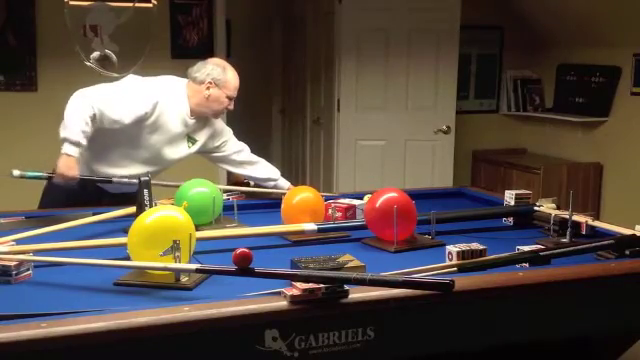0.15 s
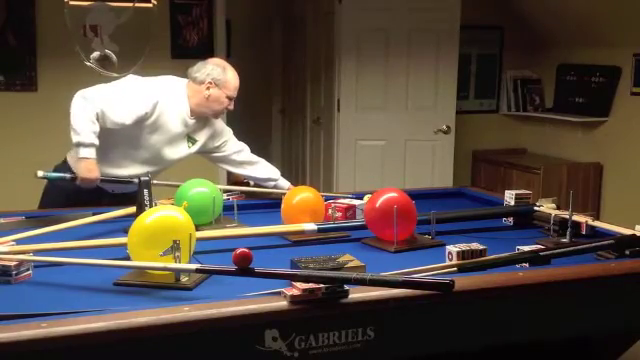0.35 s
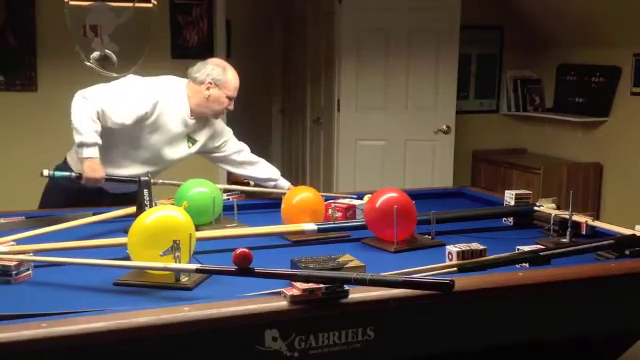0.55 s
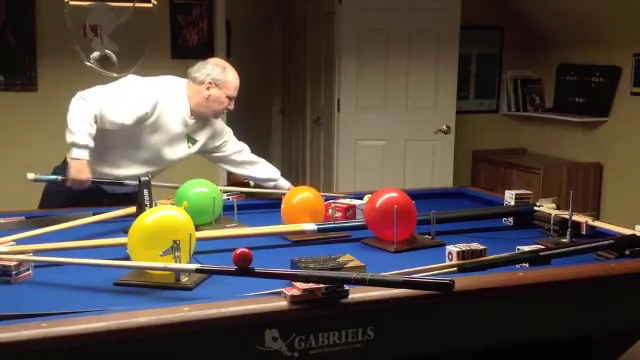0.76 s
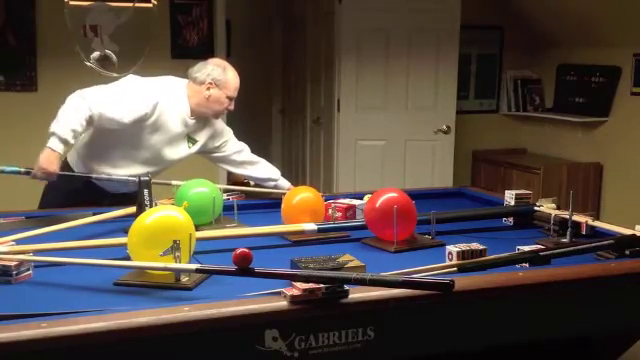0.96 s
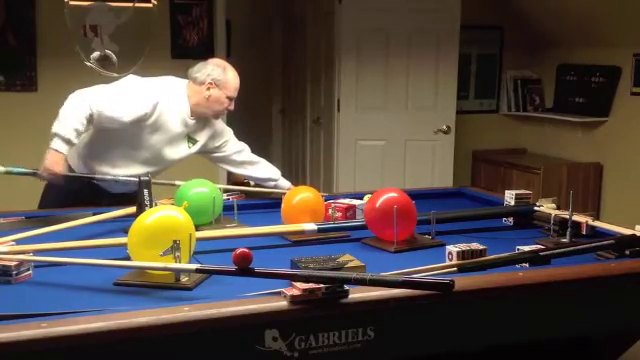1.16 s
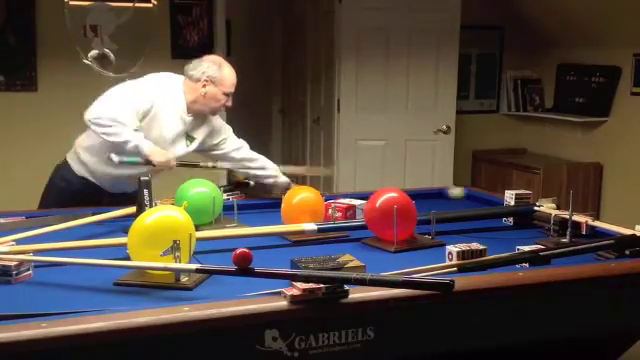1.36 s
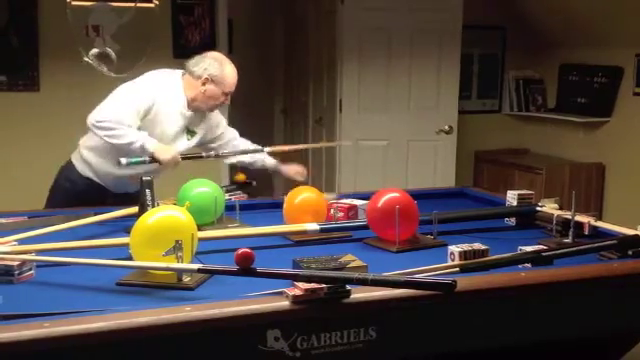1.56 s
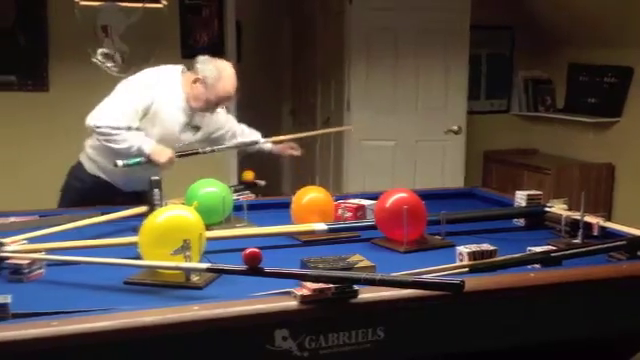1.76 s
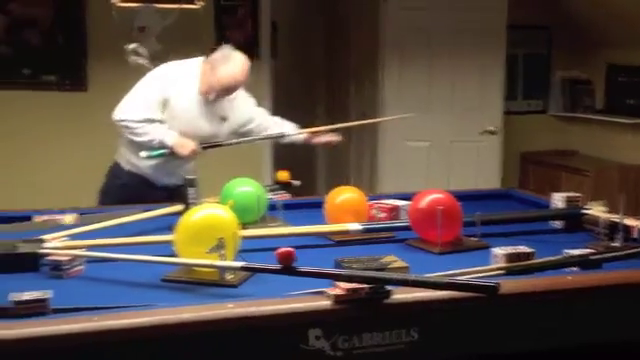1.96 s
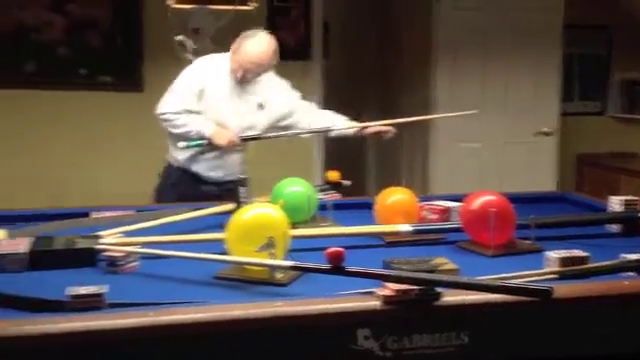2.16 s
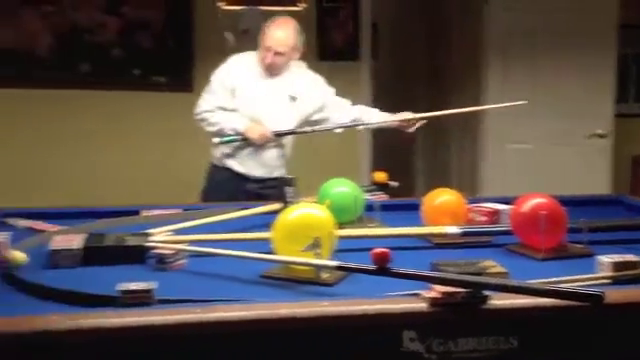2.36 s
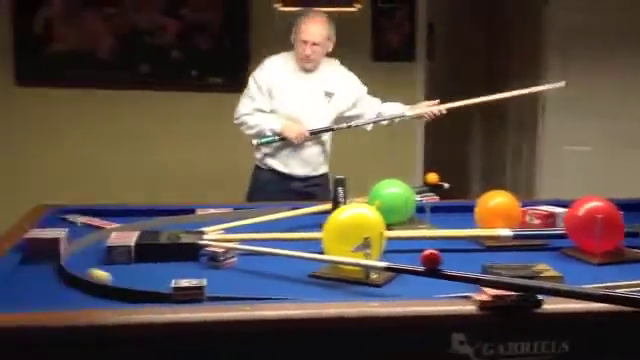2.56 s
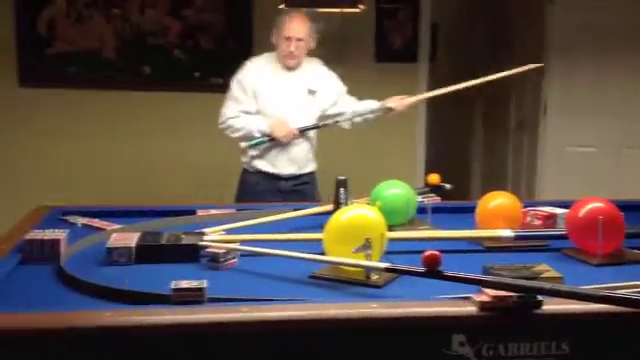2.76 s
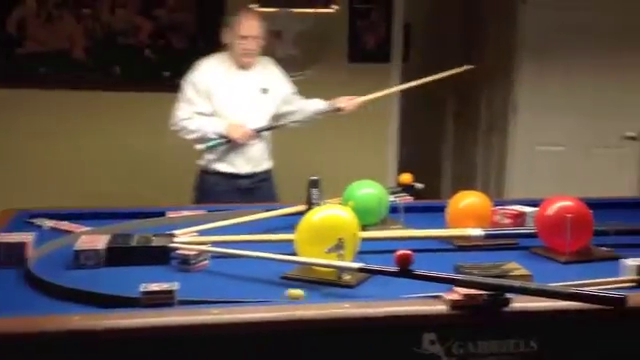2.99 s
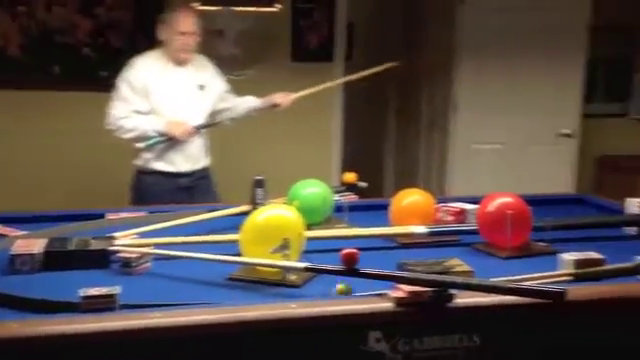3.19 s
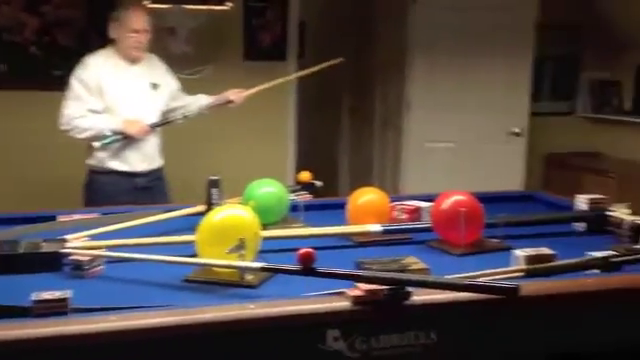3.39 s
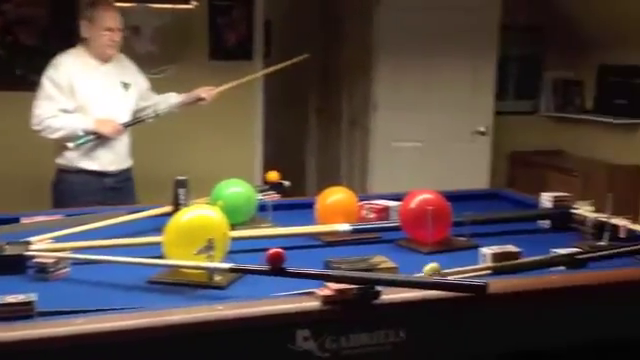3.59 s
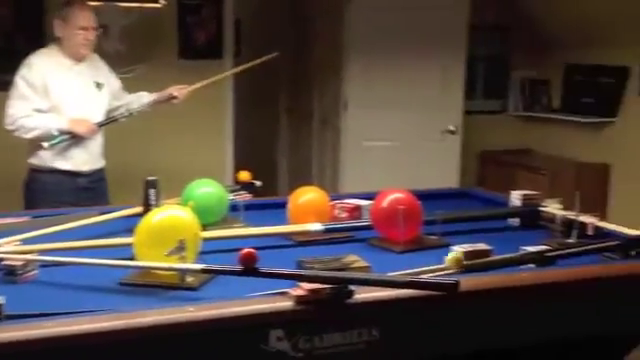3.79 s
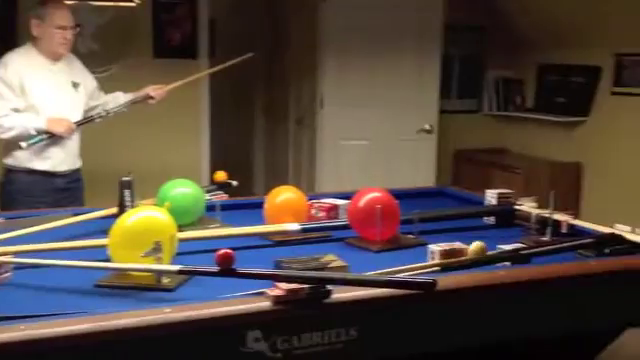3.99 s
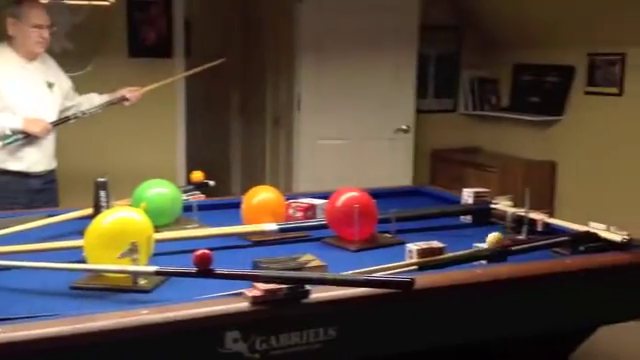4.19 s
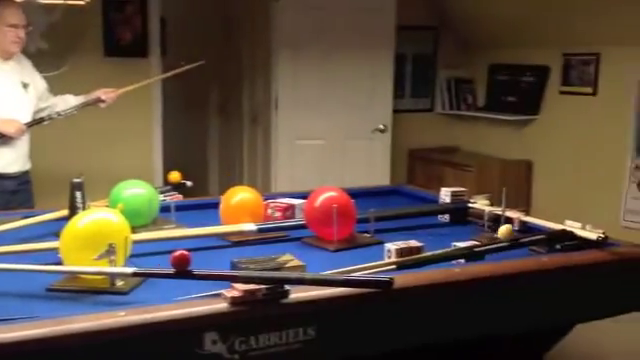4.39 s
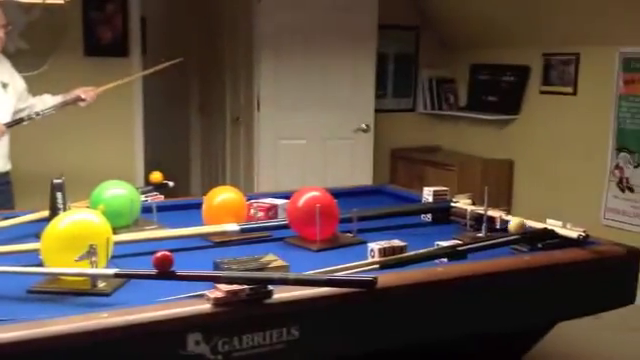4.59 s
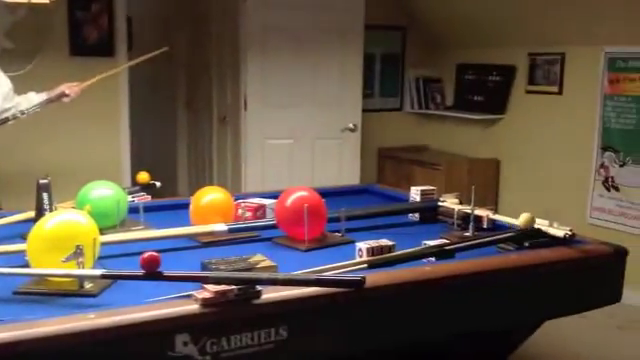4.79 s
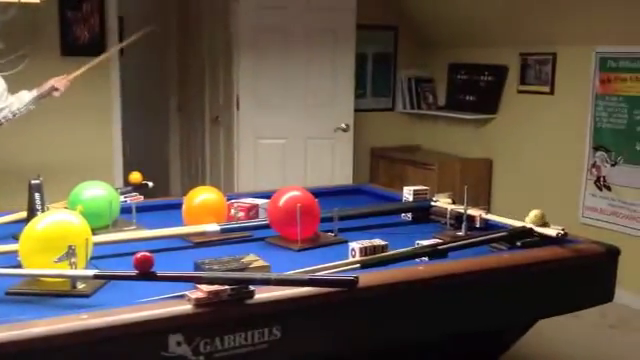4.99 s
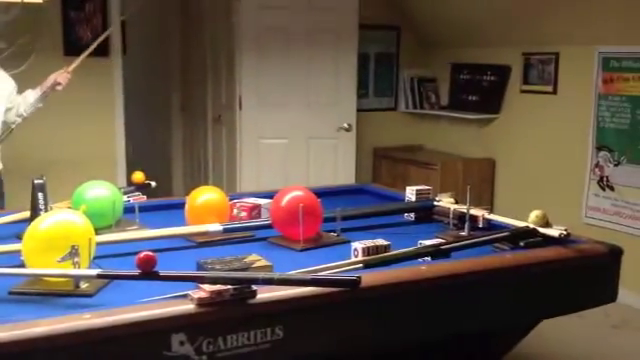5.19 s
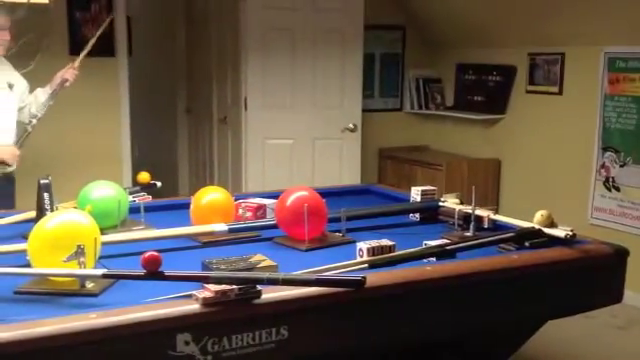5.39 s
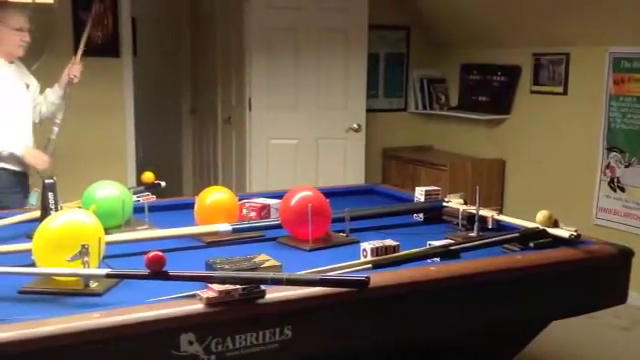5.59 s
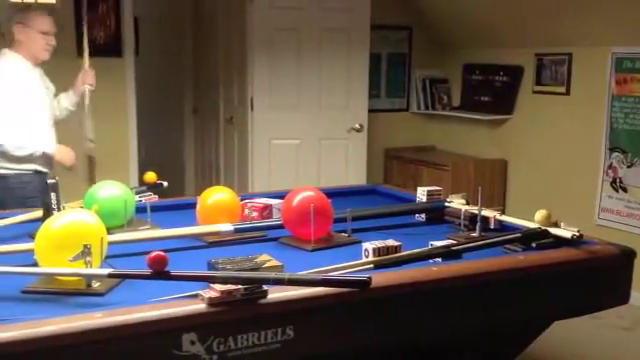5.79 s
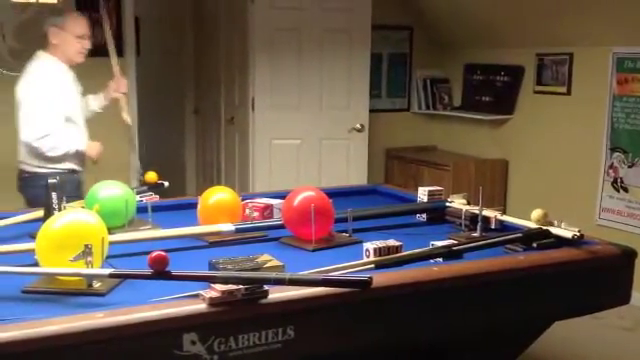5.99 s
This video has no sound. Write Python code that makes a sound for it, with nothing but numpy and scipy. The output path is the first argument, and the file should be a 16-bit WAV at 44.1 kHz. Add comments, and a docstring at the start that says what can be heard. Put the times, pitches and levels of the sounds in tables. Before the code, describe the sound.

In a small carpeted den with faint hiss, wavering low hum and thin motor whine, a cue strikes a ball loudly after a second of quiet. Thuds over props and cushions follow, then fading skips on cloth, hard clicks and a soft roll. Light knocks on rail and sticks lead to faint ramp bumps, ending in a short bright clatter of thin metal. The microphone stands a little away, catching short room echoes.

```python
"""A trick shot on a pool table in a carpeted den. Air, microphone hiss, a swelling hum and a small motor's
whine run throughout, as shaped noise, noise-driven resonances and sines. The cue strikes and the ball thuds
over props and cushions amid deep soft thumps, skips over the cloth, rolls, clicks hard, knocks on rail and
sticks, bumps up a ramp of cue sticks and clatters into thin metal parts. Blows are bursts of touches that
crack, ring modes and echo in the room; rolling is filtered noise of uneven grains."""
import sys
import numpy as np
from scipy import signal
from scipy.fft import rfft, irfft
from scipy.io import wavfile

SR = 44100
rng = np.random.default_rng(int(sys.argv[2]) if len(sys.argv) > 2 else 0)


def to_wav(s):
    """Save 16-bit WAV."""
    ch = np.atleast_2d(s).T  # columns
    pcm = np.round(np.clip(ch, -1, 1) * 32767)  # PCM
    wavfile.write(sys.argv[1], SR, pcm.astype(np.int16))


N = 266805  # length in samples

# Air and microphone hiss, spectral shape: f/Hz, relative level/dB per Hz
AIR_SPECTRUM = [(30, -45.5), (60, -45), (90, -19.5), (120, -3), (250, -4), (360, 5), (450, -5.5),
                (600, -10.5), (900, -14), (2000, -17.5), (4500, -19.5), (10000, -22), (15400, -26)]
AIR_DB = -63.5  # rms
# Wavering hum resonances: f/Hz, width/Hz, rms level/dB before the swell
HUM_BANDS = [(335.5, 2.7, -58.5), (677, 36, -74.5)]
# Gain of the hum over time: t/s, level/dB
HUM_SWELL_CURVE = [(0, -3), (1.2, -9.5), (3.4, -0.5), (4.7, -2.5), (6.05, 1.8)]
# Motor whine lines: multiple of the motor speed, mean rms level/dB
MOTOR_LINES = [(20, -63.5), (21, -82), (24, -83), (36, -84), (39, -84), (40, -84.5)]
MOTOR_HZ = 48.14

# Blow levels below are rms over the first 40 ms, before the final filters.
# Cue strikes: t/s, level/dB
CUE_STRIKES = [(1.2935, -21.5), (1.3005, -26.5)]
# Thuds of the table bed, the first as the cue strike shakes it, the rest as the ball lands on props and
# cushions: t/s, level/dB, contact/ms
BED_THUDS = [(1.3, -27.5, 0.56), (1.4, -30, 0.97), (1.558, -28.5, 0.63), (1.574, -33, 0.48),
             (1.666, -30.5, 0.76), (2.153, -45, 0.86), (3.476, -56.5, 2.4), (4.98, -39.5, 0.36),
             (5.071, -51.5, 0.87)]
# Deep soft low thumps: t/s, peak level/dB, f/Hz
LOW_THUMPS = [(1.432, -46, 119), (1.553, -61, 45)]
# Skipping touches on the cloth: t/s, level/dB
CLOTH_SKIPS = [(1.695, -39), (1.722, -45), (1.746, -39.5), (1.764, -45), (1.792, -44), (1.818, -49),
               (1.84, -48.5), (1.882, -52.5)]
# Four rolls, dull, brighter, brightest, mostly dull:
# start t/s, end t/s, nominal starting level/dB, fade/dB per s (negative grows), hardness/0-1
ROLL_STRETCHES = [(1.863, 2.128, -57.5, 14, 0), (2.18, 3.109, -59.5, -5, 0.46),
                  (3.078, 3.432, -64, 17, 0.6), (3.484, 5.0, -57.5, 7.5, 0.1)]
# Swell of the bright part of the rolling sound: t/s, gain level/dB
BRIGHT_ROLL_SWELL = [(2.3, 4), (2.36, 1), (2.415, 7.5), (2.435, 3), (2.475, 2), (2.488, 12), (2.55, 4.5),
                     (2.71, -1), (2.76, 2.5), (2.87, -3), (2.95, 2), (3.08, -3)]
# Hard clicks and faint ticks: t/s, level/dB, contact/ms, centre f/Hz of the struck spot
HARD_CLICKS = [(1.9358, -35, 0.074, 2880), (1.9445, -57, 0.16, 6000), (2.1524, -39.5, 0.054, 2520),
               (2.1705, -50.5, 0.052, 10000), (2.183, -52, .09, 7000), (2.195, -44, 0.13, 5500),
               (2.2063, -49, 0.087, 6840), (2.224, -59, 0.067, 9000), (3.779, -70, 0.092, 3500),
               (5.627, -67.5, 0.05, 9000)]
# Knocks of the ball on rail and sticks: t/s, level/dB, contact/ms, centre f/Hz of the struck spot
BALL_KNOCKS = [(2.158, -45, 0.37, 920), (2.175, -49.5, 0.38, 1510), (2.191, -46.5, 0.25, 1610),
               (2.21, -54, 0.34, 1180), (3.201, -58, 4, 607), (3.272, -46, 0.27, 2600),
               (3.288, -47.5, 0.4, 1380), (3.454, -47.5, 0.34, 2880), (3.474, -42.5, 0.34, 2420),
               (3.496, -53, 0.54, 1510), (5.459, -59, 0.46, 1770)]
# Bumps over joints of the ramp: t/s, level/dB, contact/ms, centre f/Hz of the struck spot
JOINT_BUMPS = [(3.875, -59.5, 0.7, 1170), (4.022, -58.5, 1, 1290), (4.119, -58, 0.99, 1220),
               (4.24, -57.5, 0.54, 830), (4.405, -66.5, 0.64, 800), (4.46, -58, 0.99, 980),
               (4.691, -56, 0.56, 1310)]
# Clatter of thin metal parts: t/s, level/dB, contact/ms, centre f/Hz of the struck spot
METAL_HITS = [(4.9237, -63, 0.32, 1790), (4.969, -35, 0.092, 2050), (4.979, -36.5, 0.15, 2600),
              (5.038, -33.5, 0.095, 2550), (5.051, -40, 0.089, 3000), (5.072, -34.5, 0.13, 980),
              (5.0953, -35, 0.064, 4100), (5.119, -39.5, .18, 3220), (5.1544, -47, 0.39, 1470),
              (5.301, -46.5, 0.2, 2200), (5.3195, -44, 0.33, 3600), (5.345, -75, 0.26, 3000),
              (5.414, -53, 0.47, 2940)]

# Ringing modes of each struck thing: f/Hz, relative level/dB, t60/s
CUE_MODES = [(280, -10, 0.02), (427, -2, 0.03), (610, -18, 0.043), (1010, 0.5, 0.023), (1096, 1, 0.029),
             (1320, 9.5, 0.0099), (1680, -7, 0.033), (1800, -2, 0.008), (2374, -6, 0.096), (2550, 4, .03),
             (2636, 6, .03), (2380, 8, .012), (3224, 5, 0.012)]
BED_MODES = [(165.8, -9, 0.18), (183, -3, 0.071), (245, -10, 0.14), (295.8, -5, 0.13), (377.7, -3, 0.055),
             (465, 1.5, 0.059), (548.6, -1.5, 0.038), (639, -4, 0.094), (959, 17.5, 0.0034),
             (1620, 18, 0.0075), (1850, 15, 0.0086), (2400, 20, 0.0043), (2872, 18, 0.003)]
RAIL_MODES = [(525, -5, 0.028), (1604, 8.5, 0.02), (2047, 7.5, 0.065), (2600, 16, 0.0031),
              (3700, 10, 0.0025), (4970, -14, 0.014)]
STICK_MODES = [(311, -14, 0.013), (780, 3.5, 0.028), (983, -10, 0.05), (1504, -3.5, 0.052),
               (1715, -15.5, 0.044), (2240, -4.5, 0.051), (2306, 9.5, 0.0095), (2850, -1.5, 0.02),
               (3070, 9.5, 0.005), (3590, 9, 0.013), (3600, 4.5, 0.016)]
METAL_MODES = [(950, 0, 0.06), (1500, 0, 0.05), (1985, 5, 0.045), (2470, 4, 0.05), (3030, 2, 0.04),
               (3220, 4, 0.055), (3780, 3, 0.07), (3890, 2, 0.06), (2250, 16, 0.006), (4670, 3, 0.055),
               (5460, 4, 0.04), (6250, 5, 0.03), (7110, 6, 0.03), (7550, 5, 0.03)]
# Decay of the room's echoes: f/Hz, t60/s
ROOM_DECAY = [(105, 0.38), (180, 0.83), (400, 0.59), (1000, 0.28), (2500, 0.24), (6000, 0.28),
              (14000, 0.11)]

TAIL = 24000  # samples kept after each blow
BUILD_UP_S = 0.0025  # rise of the echoes
SPOT_SHARPNESS = 2.2  # centre over width of the region the struck spot brings out


def amp(db):
    """Turn dB into linear gain."""
    return 10 ** (np.asarray(db) / 20)


def rms_one(x):
    """Scale a signal to rms 1."""
    return x / np.sqrt(np.mean(x ** 2) + 1e-20)


def curve_db(points, t):
    """Read a table of time and dB as gain, straight in dB between points."""
    return amp(np.interp(t, *np.transpose(points)))


def at_hz(points, hz):
    """Read a frequency table along a logarithmic frequency axis."""
    table_hz, values = np.transpose(points)
    return np.interp(np.log(hz), np.log(table_hz), values)


def ring(x, hz, t60):
    """Drive a decaying resonance: a unit click sets off a sine that starts near height 1."""
    radius = amp(-60 / (t60 * SR))
    angle = 2 * np.pi * hz / SR
    return signal.lfilter([0, np.sin(angle)], [1, -2 * radius * np.cos(angle), radius ** 2], x)


def filtered(x, order, hz, kind):
    """Pass a signal through a Butterworth filter."""
    return signal.sosfilt(signal.butter(order, hz, kind, fs=SR, output="sos"), x)


def drift(rate):
    """Random wander: normal knots, rate per second, joined by straight lines."""
    knots = rng.standard_normal(int(N / SR * rate) + 2)
    return np.interp(np.arange(N) * rate / SR, np.arange(len(knots)), knots)


def room(echo_db):
    """Echoes of one spot: direct sound, then noise that builds up and dies away band by band."""
    t = np.arange(TAIL) / SR
    edges = 80 * 2 ** np.arange(0, 8.1, .8)
    bins = np.fft.rfftfreq(TAIL, 1 / SR)
    spectrum = rfft(rng.standard_normal(TAIL))
    echoes = np.zeros(TAIL)
    for low, high in zip(edges, edges[1:]):
        band = irfft(spectrum * (bins >= low) * (bins < high), TAIL)
        echoes += band * amp(-60 * t / at_hz(ROOM_DECAY, np.sqrt(low * high)))
    echoes *= 1 - np.exp(-(t / BUILD_UP_S) ** 2)
    echoes *= amp(echo_db) / np.sqrt(np.sum(echoes ** 2))
    echoes[0] = 1  # direct sound
    return echoes


def blows(events, modes, crack_db, low_hz, touches_per_s, echo_db, first_touch, rattle_s, swell_s, detune,
          contact_s=0, softening=0, reflection_db=-np.inf, reflection_s=.003, spot_db=0):
    """Touches, an optional rattle and reflection crack, ring modes and fill the room; long contacts are dull."""
    out = np.zeros(N + TAIL)
    t = np.arange(TAIL // 2) / SR
    hardest_db = max(row[1] for row in events)
    for start, level_db, *more in events:
        # a loose thing starts weakly and swells as it rattles
        touches = (rng.random(len(t)) < touches_per_s / SR) * rng.standard_normal(len(t))
        touches *= np.exp(-t / rattle_s) * (1 - np.exp(-t / swell_s))
        touches[0] = first_touch
        lag = round(reflection_s * SR)
        touches[lag:] += amp(reflection_db) * touches[:-lag]

        # force swells and fades over the contact; where the row gives none, weaker means longer
        contact = more[0] / 1000 if more else contact_s * amp(softening * (hardest_db - level_db))
        push = t[:300] ** 3 * np.exp(-8 * t[:300] / contact)
        force = np.convolve(touches, push)[:len(t)]

        body = np.zeros(len(t))
        sign = -(-1.) ** (len(modes) - 1)  # neighbouring modes start in opposite phase
        for hz, mode_db, t60 in modes:
            gain = sign * amp(mode_db + rng.normal(0, 1.5))
            body += gain * ring(force, hz * rng.normal(1, detune), t60)
            sign = -sign
        crack = filtered(force, 2, low_hz, "high")
        struck = body + amp(crack_db) * crack
        if len(more) > 1:
            spot = signal.lfilter(*signal.iirpeak(more[1], SPOT_SHARPNESS, fs=SR), struck)
            struck = struck + amp(spot_db) * spot

        heard = signal.fftconvolve(struck, room(echo_db))[:TAIL]
        first_rms = np.sqrt(np.mean(heard[:SR // 25] ** 2))  # first 40 ms
        at = round(start * SR)
        out[at:at + TAIL] += amp(level_db) * heard / first_rms
    return out[:N]


def air_hiss():
    """Air and microphone hiss: noise shaped by its spectrum."""
    bins = np.fft.rfftfreq(N, 1 / SR) + 1  # 1 Hz up, to keep the logarithm finite
    return amp(AIR_DB) * rms_one(irfft(rfft(rng.standard_normal(N)) * amp(at_hz(AIR_SPECTRUM, bins)), N))


def air_hum():
    """Wavering hum: noise keeps narrow resonances ringing under a slow swell."""
    hum = np.zeros(N)
    for hz, width, level_db in HUM_BANDS:
        hum += amp(level_db) * rms_one(ring(rng.standard_normal(N), hz, 3.3 / width))
    return curve_db(HUM_SWELL_CURVE, np.arange(N) / SR) * hum


def motor_whine():
    """Steady-pitched sines at multiples of the motor speed, each wandering slightly in level."""
    t = np.arange(N) / SR
    whine = np.zeros(N)
    for multiple, level_db in MOTOR_LINES:
        line = np.sin(2 * np.pi * (multiple * MOTOR_HZ * t + rng.random()))
        whine += np.sqrt(2) * amp(level_db + 0.5 * drift(6.4)) * line
    return whine


def cue_strike():
    """The cue rings and rattles briefly after a very short contact."""
    return blows(CUE_STRIKES, CUE_MODES, crack_db=29.5, low_hz=261, touches_per_s=7300, echo_db=-7.5,
                 first_touch=0.05, contact_s=0.00016, softening=0.0065, rattle_s=0.013, swell_s=0.0017,
                 detune=0.0028)


def thuds():
    """Thuds set the table bed ringing: the first as the cue strike shakes it, the others as the ball lands on
    props and cushions."""
    return blows(BED_THUDS, BED_MODES, crack_db=25.5, low_hz=255, touches_per_s=5000, echo_db=-3.5,
                 first_touch=0.042, rattle_s=0.0065, swell_s=0.0044, detune=0.013)


def low_thumps():
    """Deep soft low thumps: a few sine cycles that swell and fade."""
    out = np.zeros(N)
    for start, peak_db, hz in LOW_THUMPS:
        t = np.arange(int(3.5 / hz * SR)) / SR  # 3.5 cycles
        at = round(start * SR)
        out[at:at + len(t)] += amp(peak_db) * np.hanning(len(t)) * np.sin(2 * np.pi * hz * t)
    return out


def skips():
    """The ball skips over the cloth; weaker touches have longer contacts and sound duller."""
    return blows(CLOTH_SKIPS, BED_MODES, crack_db=29, low_hz=253, touches_per_s=5300, echo_db=0,
                 first_touch=0.28, contact_s=0.00095, softening=0.39, rattle_s=0.019, swell_s=0.0018,
                 detune=0.013)


def rolling():
    """Uneven grains under the ball: bright and dull grains mixed by hardness, the dull with a bed drone."""
    t = np.arange(N) / SR
    grains = rng.standard_normal(N) * amp(2.4 * drift(38) + 1.6 * drift(8))
    dull = rms_one(filtered(grains, 2, [130, 900], "band"))
    bright = rms_one(filtered(grains, 2, [550, 2100], "band"))
    bed = rms_one(sum(amp(db) * ring(dull, hz, t60) for hz, db, t60 in BED_MODES))
    bright_roll = curve_db(BRIGHT_ROLL_SWELL, t) * bright
    dull_roll = 0.82 * dull + 0.073 * bed
    out = np.zeros(N)
    for start, end, level_db, fade_db, hardness in ROLL_STRETCHES:
        edges = np.clip(np.minimum(t - start, end - t) / 0.029, 0, 1)  # 29 ms fades
        level = amp(level_db - fade_db * np.clip(t - start, 0, end - start))
        out += edges * level * (np.sqrt(hardness) * bright_roll + np.sqrt(1 - hardness) * dull_roll)
    return out


def hard_clicks():
    """Hard clicks and faint ticks: one touch and one quick reflection ring short modes, with no rattle."""
    return blows(HARD_CLICKS, RAIL_MODES, crack_db=28.5, low_hz=980, touches_per_s=0, echo_db=-4,
                 first_touch=1, spot_db=-3.5, rattle_s=1, swell_s=1, detune=0.011, reflection_db=0.5,
                 reflection_s=0.00269)


def ball_knocks():
    """Knocks of the ball on rail and sticks ring and rattle, coloured by the struck spot."""
    return blows(BALL_KNOCKS, STICK_MODES, crack_db=38.5, low_hz=580, touches_per_s=5400, echo_db=-3.3,
                 first_touch=0.13, rattle_s=0.008, swell_s=0.0036, detune=0.01, spot_db=0)


def ramp_bumps():
    """The ball bumps over joints as it climbs, ringing the sticks with a strong colour of the spot."""
    return blows(JOINT_BUMPS, STICK_MODES, crack_db=31, low_hz=674, touches_per_s=5900, echo_db=-5.5,
                 first_touch=0.075, rattle_s=0.014, swell_s=0.008, detune=0.015, spot_db=8)


def metal_clatter():
    """Thin metal parts rattle and ring; they radiate little at the very top."""
    metal = blows(METAL_HITS, METAL_MODES, crack_db=40, low_hz=1240, touches_per_s=8000, echo_db=-3.5,
                  first_touch=0.24, rattle_s=0.012, swell_s=0.003, detune=0.008, spot_db=7)
    return filtered(metal, 2, 8400, "low")


def scene():
    """Layer background, blows and roll; all but the low thumps and background lose their deep bass."""
    background = air_hiss() + air_hum() + motor_whine()
    table = cue_strike() + thuds() + skips() + rolling() + hard_clicks()
    table += ball_knocks() + ramp_bumps() + metal_clatter()
    table = filtered(table, 6, 125, "high")  # small things radiate no deep bass
    return (background + table + low_thumps())[None]


def record(dry):
    """Round loud peaks, then cut the deep bass and the extreme top."""
    rounded = .5 * np.tanh(dry / .5)
    bass_cut = filtered(rounded, 2, 25, "high")
    # 70 dB down from 15.9 kHz up
    return signal.sosfilt(signal.cheby2(14, 70, 15900, fs=SR, output="sos"), bass_cut)


dry = scene()
out = record(dry)
to_wav(out)
```